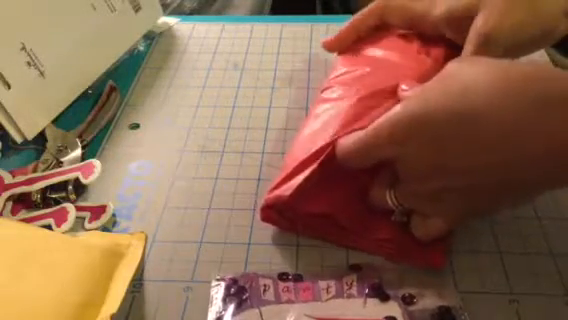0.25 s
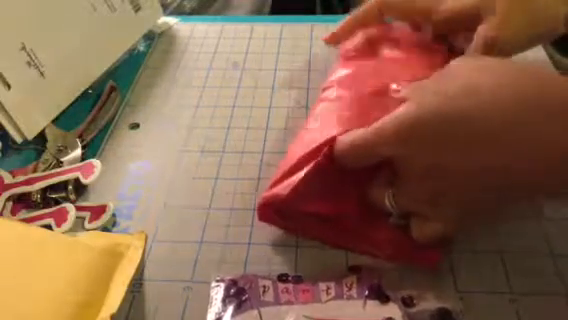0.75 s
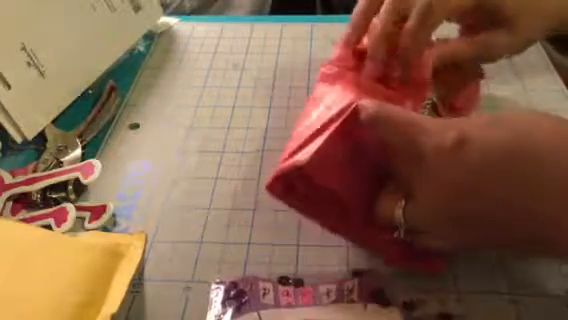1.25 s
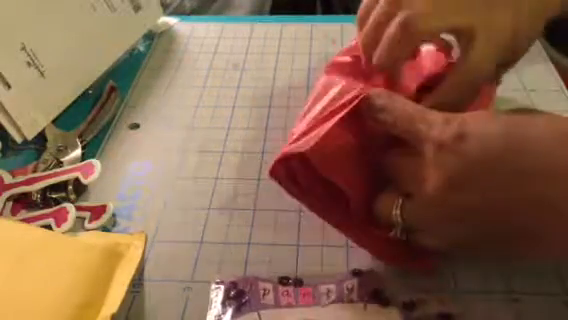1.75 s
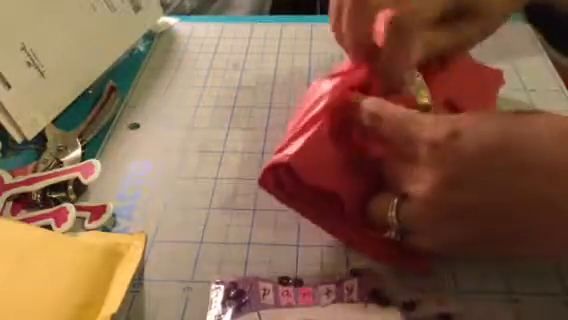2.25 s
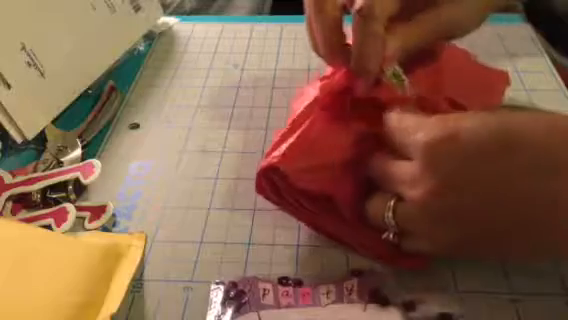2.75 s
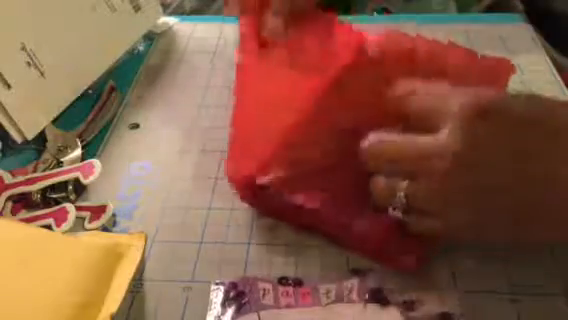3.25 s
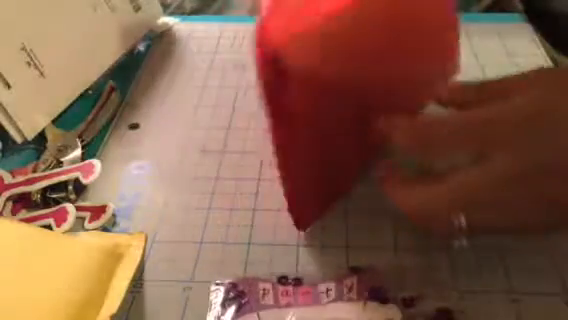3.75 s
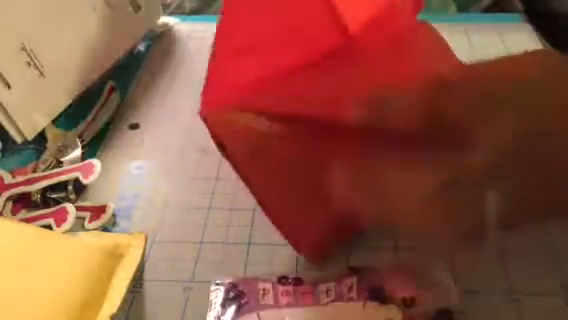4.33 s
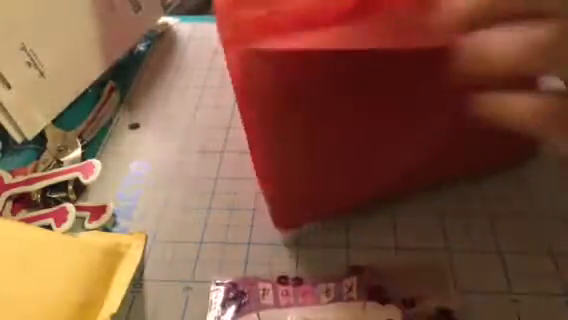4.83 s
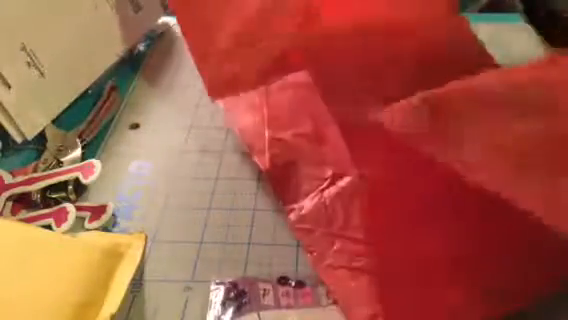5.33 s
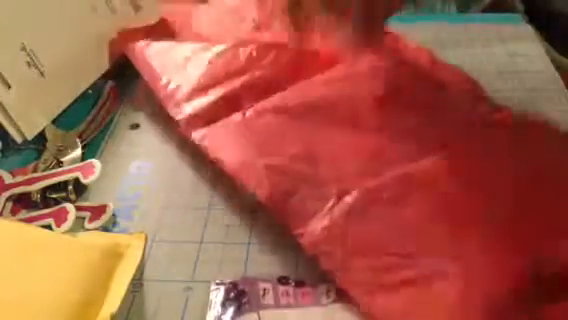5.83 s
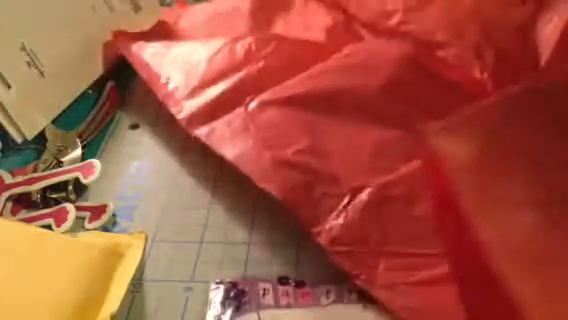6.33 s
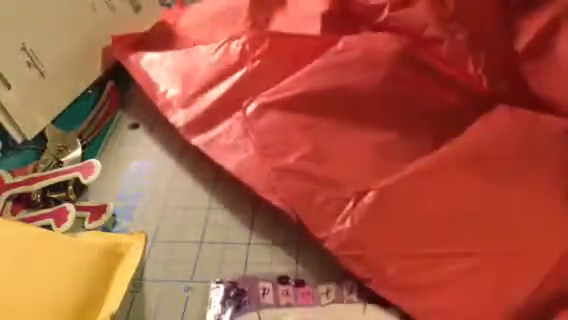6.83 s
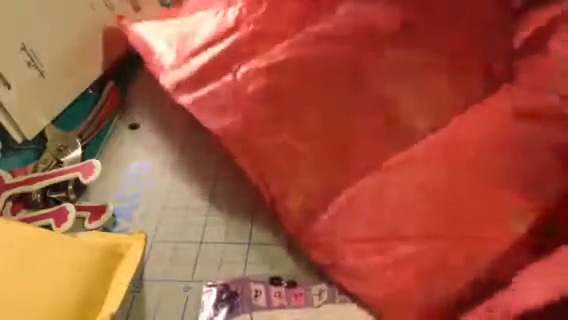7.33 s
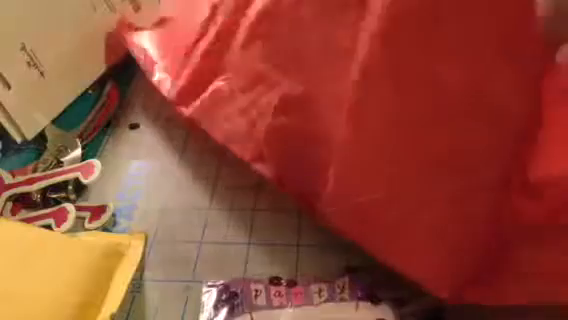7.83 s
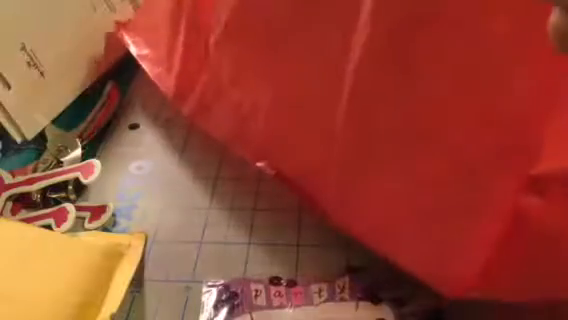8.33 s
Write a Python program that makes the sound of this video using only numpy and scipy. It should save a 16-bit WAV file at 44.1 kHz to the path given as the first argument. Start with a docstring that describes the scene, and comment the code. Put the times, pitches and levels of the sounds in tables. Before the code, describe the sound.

Thin gift wrap is handled close to the microphone in a small room with very little echo. Light crinkling starts at once, and a loud, sharp crack comes at about 0.5 seconds as a fold or tape gives way. From 1 to 3 seconds the paper rustles in short, uneven bursts dotted with crisp snaps, strongest around 1.4 and 2 seconds. The handling is lighter from 3 to 4 seconds, then picks up, with another loud crackle just after 5 seconds. From about 6 seconds the sheet opens out with a fuller rustle and more cracks, swelling again near 6.8 and 7.5 seconds before easing into softer crinkles up to the end at about 8.5 seconds. Underneath, the loose sheet makes a faint low flapping, and the parcel gives occasional soft bumps against the table.

```python
"""Thin gift wrap crackles as hands unwrap a small present on a table, close by.
Each crease in the paper buckles with a tiny snap, and thousands of snaps make a rustle.
Larger folds and tape give way with sharp cracks. In the bass, the loose sheet flaps
and the parcel bumps the table. A small room adds a short tail."""
import sys
import numpy as np
from scipy import signal
from scipy.io import wavfile
from scipy.ndimage import uniform_filter1d

SR = 44100
rng = np.random.default_rng(int(sys.argv[2]) if len(sys.argv) > 2 else 0)


def transcribe(u):
    """Save the signal u as a 16-bit wav file named by the first command-line argument.

    u: samples, shape (n,) or (channels, n), limited to [-1, 1]; the rate is SR.
    q: integer samples, one column per channel.
    """
    v = np.clip(np.atleast_2d(u).T, -1, 1)
    q = np.round(v * 32767).astype(np.int16)
    wavfile.write(sys.argv[1], SR, q)


N = 377407
SPLIT_HZ, TOP_HZ = 3300, 15350  # flat panels of paper sound below the split, crisp creases above it


def gain(db):
    """Turns decibels into a number to multiply by."""
    return 10 ** (np.asarray(db) / 20)


def unit_level(x):
    """Scales a signal to an average (rms) level of 1."""
    return x / np.sqrt(np.mean(x ** 2) + 1e-20)


def curves(rows):
    """Joins rows of (time_s, values...) with straight lines, one curve per value."""
    time_s, *columns = np.transpose(rows)
    return [np.interp(np.arange(N) / SR, time_s, column) for column in columns]


def drift(per_s):
    """A smooth random wobble of size 1 that changes about per_s times a second."""
    span = int(SR / per_s)
    return unit_level(uniform_filter1d(uniform_filter1d(rng.standard_normal(N), span), span))


def shape_tone(x, tone):
    """Filters x to follow rows of (pitch_hz, level_db), with no ringing ahead of a snap."""
    pitch_hz, level_db = np.transpose(tone)
    grid_hz = abs(np.fft.fftfreq(8192, 1 / SR))
    grid_db = np.interp(np.log(grid_hz + 1), np.log(pitch_hz + 1), level_db)
    spectrum = np.exp(np.conj(signal.hilbert(np.log(gain(grid_db)))))
    taps = np.fft.ifft(spectrum).real[:4096]
    return signal.oaconvolve(x, taps)[:len(x)]


def resonate(x, pitch_hz, width_hz):
    """Makes x ring at a steady or moving pitch; a narrower width rings longer."""
    turn = np.exp(2j * np.pi * np.cumsum(pitch_hz * np.ones(len(x))) / SR)
    feedback = np.exp(-np.pi * width_hz / SR)
    return 2 * (turn * signal.lfilter([1 - feedback], [1, -feedback], x / turn)).real


def burst(noise, fade_s):
    """Noise that starts almost at once and drops 60 dB in fade_s."""
    t = np.arange(len(noise)) / SR
    return noise * (1 - np.exp(-t / 0.00048)) * gain(-60 * t / fade_s)


def room(x, fade_s=0.048):
    """A small room sends back many faint echoes that die away fast."""
    echoes = np.zeros(SR // 2)
    at = np.arange(120, SR // 2 - 20, 20)
    strengths = rng.choice([-1., 1.], len(at)) * gain(-60 * at / SR / fade_s)
    echoes[at + rng.integers(0, 20, len(at))] = strengths
    return signal.oaconvolve(x, echoes / np.linalg.norm(echoes))[:N]


# The parcel pushes on the table: start_s, level_db, pitch_hz
TABLE_BUMPS = [(0.304, -44, 290), (0.482, -37.5, 135), (1.929, -39.5, 196.4), (2.197, -42, 170),
               (2.6, -44, 51), (3.041, -49, 60.4), (3.057, -47, 295), (3.637, -43, 240), (4.145, -41, 96),
               (4.2, -50, 55), (5.123, -39.5, 159), (5.15, -48, 65), (6.691, -44, 146), (6.774, -42, 121),
               (7.542, -38.5, 138), (7.971, -43, 131)]


def table_bumps(rise_cycles=0.77, length=13000):
    """Each soft push swells and dies within a few vibrations of the table top or parcel."""
    out, t = np.zeros(N + length), np.arange(length) / SR
    for start_s, level_db, pitch_hz in TABLE_BUMPS:
        age, at = t * pitch_hz / rise_cycles, round(start_s * SR)
        swell = age * np.exp(1 - age)
        out[at:at + length] += gain(level_db) * swell * np.sin(2 * np.pi * pitch_hz * t)
    return out[:N]


# How strongly the freed sheet flaps when the panels are at reference_db: time_s, level_db
FLAP_LEVELS = [(0, -60), (.35, -66), (1.5, -62.5), (2, -58.5), (2.4, -65), (2.65, -59), (3.7, -56.5),
               (4.3, -60.5), (5.1, -58.5), (5.5, -63), (6.8, -52.5), (7.4, -59), (8, -54), (8.56, -56)]
# The deep tone of the flapping: pitch_hz, level_db
FLAP_TONE = [(25, -25), (49, -8), (141, -3), (188, -6.5), (244, -6), (330, -13), (430, -46)]


def sheet_flaps(panel_db, reference_db=-49.5, follow=0.6):
    """The moving sheet makes a lumpy low noise that rises and falls with the rustling."""
    lumps = gain(3.7 * drift(31))
    rumble = unit_level(shape_tone(lumps * rng.standard_normal(N), FLAP_TONE))
    movement_db = follow * (uniform_filter1d(panel_db, size=2000) - reference_db)
    return gain(curves(FLAP_LEVELS)[0] + movement_db) * rumble


# The tone of the paper and microphone together: pitch_hz, level_db
PAPER_TONE = [(190, -10.5), (330, -3), (626, -1.5), (1250, -2.5), (2080, -1.5), (3420, -7.5), (6820, -5.5),
              (7750, -6.5), (9100, -2.5), (12900, -6), (15200, -10)]


def paper_bands(x):
    """Gives x the tone of paper and splits it into low panel sound and high crisp sound."""
    paper = shape_tone(x, PAPER_TONE)
    return [signal.sosfilt(signal.butter(4, SPLIT_HZ, kind, fs=SR, output="sos"), paper)
            for kind in ("low", "high")]


# Folds and tape that give way: start_s, crisp_peak_db, crease_hz, panel_peak_db, panel_hz
FOLD_CRACKS = [(0.216, -33, 11400.0, -35, 1120.0), (0.307, -51, 11500.0, -32, 1830),
               (0.414, -33.5, 3500.0, -33.5, 1540), (0.491, -14, 9100, -16.5, 1320),
               (0.535, -22.5, 6860, -34, 2640.0), (0.66, -37.5, 4500.0, -35.5, 1660.0),
               (0.828, -30, 4000, -34, 1900), (1.016, -31, 8550, -50, 2140.0),
               (1.194, -30.5, 9500, -48, 1500), (1.328, -24.5, 5600, -46, 2010.0),
               (1.361, -30, 8930, -30, 1900), (1.376, -16.5, 4280, -38, 2150.0),
               (1.448, -30, 7200.0, -38, 735.0), (1.607, -25, 8500.0, -28.5, 2600),
               (1.663, -44, 8700.0, -26.5, 1750), (1.757, -29, 6500.0, -32, 2600),
               (1.943, -18.5, 11300, -21.5, 714), (2.014, -22, 9000, -29.5, 2000),
               (2.196, -31, 11100.0, -31.5, 1290.0), (2.317, -30, 11800.0, -22, 1990.0),
               (2.336, -26, 7000.0, -29, 2440.0), (2.478, -34, 8100.0, -33.5, 2630.0),
               (2.649, -30.5, 8950, -34.5, 2080.0), (2.706, -20, 13400, -53, 2650.0),
               (2.827, -27.5, 8500.0, -45, 2120.0), (2.922, -29, 7100.0, -36.5, 2050.0),
               (3.036, -27.5, 8900.0, -30.5, 1300.0), (3.157, -33, 8950, -38, 1700),
               (3.504, -30, 8400, -38.5, 895), (3.581, -28, 4700, -34.5, 1660),
               (3.639, -29, 6000.0, -31.5, 810), (3.97, -33, 4630, -43, 1660), (4.01, -29, 6500, -38, 1445),
               (4.083, -39, 5200.0, -45, 1500.0), (4.303, -40.5, 4400, -43, 2150),
               (4.347, -37, 4100.0, -34, 1110), (4.379, -27.5, 8650, -34.5, 1270),
               (4.422, -30.5, 5600.0, -33, 1070), (4.482, -43, 3500, -36.5, 1170),
               (4.569, -25, 8420, -37.5, 2200.0), (4.621, -23, 9500.0, -44, 1080.0),
               (4.714, -24, 8400.0, -37, 965), (4.94, -24, 6700.0, -35.5, 1910.0),
               (5.126, -16, 3870, -18.5, 1440), (5.477, -33.5, 9200, -50.5, 1760),
               (5.515, -33, 8700.0, -48, 949), (5.541, -33, 6600.0, -40.5, 1400.0),
               (5.588, -41, 9600.0, -48, 2100.0), (5.611, -36.5, 7000, -55, 2000),
               (5.812, -28.5, 9500.0, -56, 2920.0), (5.908, -29, 13300, -42, 1520),
               (6.037, -33, 10100, -31.5, 2270), (6.165, -34, 9400.0, -26, 1740),
               (6.213, -21, 9000, -25, 1220), (6.307, -21, 11600, -32.5, 1950.0),
               (6.427, -29, 5600.0, -38.5, 1950), (6.694, -26, 5250, -34.5, 1400),
               (7.18, -28, 9100, -35, 2030), (7.361, -26, 11800, -32, 1600),
               (7.644, -26.5, 6900.0, -40.5, 1300), (7.82, -26, 6300, -38, 1660.0),
               (7.972, -37, 8400.0, -33, 940)]


def fold_cracks(length=8000):
    """A sharp crack and smaller slips ring the crease and its panel; louder folds settle longer."""
    out = np.zeros(N + length)
    for start_s, crisp_peak_db, crease_hz, panel_peak_db, panel_hz in FOLD_CRACKS:
        noise = rng.standard_normal(length)
        settle_s = 0.1 * gain(0.3 * (crisp_peak_db + 4))
        panel, crisp = paper_bands(burst(noise, fade_s=0.0031) + 0.11 * burst(noise, settle_s))
        crisp = 0.47 * crisp + resonate(crisp, crease_hz, width_hz=1100)
        panel = 0.22 * panel + 0.2 * resonate(panel, panel_hz / 2, 500) + resonate(panel, panel_hz, 480)
        at = round(start_s * SR)
        out[at:at + length] += gain(crisp_peak_db) * crisp / abs(crisp).max()
        out[at:at + length] += gain(panel_peak_db) * panel / abs(panel).max()
    return out[:N]


# Each hand move sets the crisp level, the panel level relative to it, and the hollow ring of the
# pocket under the fingers: hold_start_s, hold_s, first_db, last_db, panel_offset_db, pocket_hz
HAND_MOVES = [(0.0, 0.19, -54.5, -65.5, -1.5, 1340.0), (0.123, 0.11, -54.5, -50, 1, 1320),
              (0.27, 0.17, -55, -56.5, 0.5, 1600.0), (0.501, 0.012, -35.5, -36.5, -2, 1310),
              (0.655, 0.13, -63, -59.5, -1, 1650.0), (0.765, 0.18, -50.5, -54.5, 1, 1630),
              (0.991, 0.099, -59.5, -45, -3, 1530.0), (1.138, 0.14, -51, -43.5, -4.5, 1840),
              (1.272, 0.071, -41.5, -46.5, -5, 1840), (1.362, 0.04, -41.5, -40.5, -3.5, 1840.0),
              (1.458, 0.044, -43.5, -45.5, -4, 1270), (1.537, 0.12, -47, -42.5, -3.5, 1930),
              (1.68, 0.13, -55.5, -47.5, 0.5, 1670), (1.856, 0.1, -50, -49.5, -2, 1500),
              (1.95, 0.11, -46, -39.5, -3.5, 1520), (2.199, 0.09, -50.5, -48.5, 3.5, 840),
              (2.285, 0.066, -48, -39, 0, 2310), (2.486, 0.053, -44, -41.5, -3.5, 1940.0),
              (2.594, 0.15, -53.5, -56, -4.5, 1890), (2.818, 0.023, -50.5, -55.5, -4, 1900.0),
              (2.86, 0.5, -66, -58, 0, 1530.0), (2.923, 0.12, -46.5, -43.5, -3, 1590),
              (3.12, 0.19, -54.5, -50, -2.5, 1380), (3.437, 0.015, -57.5, -54.5, 2.5, 1580.0),
              (3.51, 0.01, -57.5, -54.5, 2.5, 1450.0), (3.564, 0.099, -52, -46.5, -4.5, 1350.0),
              (3.699, 0.21, -62, -66.5, -0.5, 1470), (3.922, 0.16, -53, -49.5, -5, 1450),
              (4.141, 0.026, -37.5, -37.5, 0, 1270), (4.331, 0.071, -53, -45.5, -3.5, 1300),
              (4.566, 0.1, -47.5, -45.5, -3.5, 1300), (4.723, 0.17, -47, -50, -4.5, 1410),
              (4.907, 0.2, -44.5, -48, -4, 1220), (5.125, 0.11, -36, -48, -1.5, 1580.0),
              (5.269, 0.16, -55.5, -52, -1.5, 1890), (5.491, 0.031, -64, -56, -1, 1500),
              (5.601, 0.012, -55, -58.5, -7, 2110.0), (5.658, 0.029, -46.5, -42, -3, 1670),
              (5.74, 0.19, -55.5, -49, -6, 1700), (5.914, 0.29, -43.5, -38, -3, 1580),
              (6.162, 0.2, -45, -45.5, -5.5, 1600.0), (6.4, 0.046, -58.5, -54.5, -0.5, 1850.0),
              (6.526, 0.091, -55.5, -65, -5.5, 1932), (6.667, 0.23, -45, -41.5, -3, 1500),
              (6.926, 0.09, -50, -56, -0.5, 1910), (7.105, 0.11, -50.5, -42.5, 0.5, 1854),
              (7.235, 0.19, -48, -45, -1, 1760), (7.36, 0.58, -68, -45, -2.0, 1760.0),
              (7.422, 0.15, -46, -41.5, -1.5, 1780), (7.933, 0.052, -49.5, -46.5, -0.5, 1230),
              (8.054, 0.14, -48.5, -60.5, -2, 1620), (8.286, 0.14, -50, -56, -2, 1850),
              (8.451, 0.29, -50.5, -66, -2.5, 1720.0)]
RISE_DB_PER_S, FALL_DB_PER_S, SWELL_DB_PER_S = 750, 169, 7
LET_GO_DB, LET_GO_S = 5, 0.006  # first quick drop when the fingers stop
REST_CRISP_DB, REST_PANEL_DB, REST_POCKET_HZ = -65.5, -66.5, 1600  # paper creeping between moves


def hand_moves():
    """Each move rises, holds and falls; returns curves of crisp_db, panel_db and pocket_hz."""
    t = np.arange(0, N + 64, 64) / SR
    start_s, hold_s, first_db, last_db, panel_offset_db, pocket_hz = np.transpose(HAND_MOVES)[:, :, None]
    progress = np.clip((t - start_s) / hold_s, 0, 1)
    swell_db = SWELL_DB_PER_S * hold_s * np.sin(np.pi * progress)  # longer moves swell more midway
    held_db = first_db + (last_db - first_db) * progress + swell_db
    before_s, after_s = np.maximum(start_s - t, 0), np.maximum(t - start_s - hold_s, 0)
    fall_db = FALL_DB_PER_S * after_s + LET_GO_DB * (1 - np.exp(-after_s / LET_GO_S))
    crisp_power = gain(held_db - RISE_DB_PER_S * before_s - fall_db) ** 2
    panel_power = crisp_power * gain(panel_offset_db) ** 2
    rest_power = gain(REST_PANEL_DB) ** 2
    crisp_total = crisp_power.sum(0) + gain(REST_CRISP_DB) ** 2
    panel_total = panel_power.sum(0) + rest_power
    # Louder moves count for more in the pitch of the pocket.
    ring_hz = ((panel_power * pocket_hz).sum(0) + rest_power * REST_POCKET_HZ) / panel_total
    return curves(np.transpose([t, 10 * np.log10(crisp_total), 10 * np.log10(panel_total), ring_hz]))


def crease_snaps(effort, spread_db=4, pitch_count=40):
    """Each buckling crease is a short burst with its own ring; most are small, a few are big."""
    snaps_per_s = 800 + 3300 * effort  # harder work buckles more creases at once
    sizes = gain(spread_db * np.minimum(rng.exponential(1, N), 4.5))
    kicks = sizes * (rng.random(N) < snaps_per_s / SR) / np.sqrt(snaps_per_s)
    pitch_choice, out = rng.integers(0, pitch_count, N), np.zeros(N)
    for k, pitch_hz in enumerate(np.geomspace(500, 14500, pitch_count)):
        snap = burst(rng.standard_normal(800), fade_s=rng.uniform(0.0039, 0.0094) + 9 / pitch_hz)
        width_hz = pitch_hz * rng.uniform(0.034, 0.21)  # some patches of paper ring, some are dull
        snap = unit_level(resonate(snap, pitch_hz, width_hz) + 0.15 * snap) * np.sqrt(pitch_hz)
        out += signal.oaconvolve(kicks * (pitch_choice == k), snap)[:N]
    return unit_level(out)


def paper_rustle(crisp_db, panel_db, pocket_hz):
    """Creases snap in clumps while layers of paper slide over each other with a hiss."""
    effort = np.clip((crisp_db + 62) / 22, 0, 1)
    snaps = crease_snaps(effort)
    hiss = gain(-4) * rng.standard_normal(N)
    clumps = gain(2.5 * (1 - 0.5 * effort) * drift(90))
    panel, crisp = paper_bands((snaps + hiss) * clumps)
    fold_hz = np.clip(7000 * gain(3.04 * drift(27.5)), SPLIT_HZ, TOP_HZ)  # the working fold changes size
    crisp = 1.4 * crisp + resonate(crisp, fold_hz, width_hz=760)
    opening = (gain(np.linspace(-8.5, 7.5, N)) - 1) / 2  # thin at first, fuller as the sheet opens out
    body = opening * resonate(panel, 450, width_hz=250)
    pocket = resonate(panel, pocket_hz * gain(1.83 * drift(30)), width_hz=990)
    panel = 0.75 * (panel + body) + pocket
    panel *= gain(1.43 * drift(50))  # panels pop in clumps of their own
    return gain(crisp_db) * unit_level(crisp) + gain(panel_db) * unit_level(panel)


def scene():
    """Rustling, cracking paper in the room, over the low sounds of sheet and table."""
    crisp_db, panel_db, pocket_hz = hand_moves()
    paper = paper_rustle(crisp_db, panel_db, pocket_hz) + fold_cracks()
    return (paper + gain(-13) * room(paper) + sheet_flaps(panel_db) + table_bumps())[None]


def record(dry):
    """The microphone drops the deepest bass, then the highest treble is cut off."""
    heard = signal.sosfilt(signal.butter(3, 44, "high", fs=SR, output="sos"), dry)
    treble_cut = signal.firwin(511, TOP_HZ, window=("kaiser", 9), fs=SR)
    return signal.oaconvolve(heard, treble_cut[None], "same")


dry = scene()
out = record(dry)
transcribe(out)
```